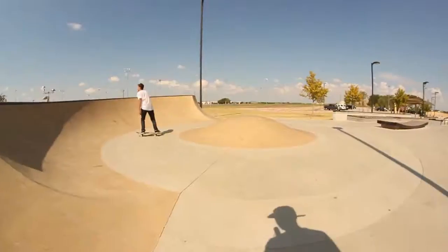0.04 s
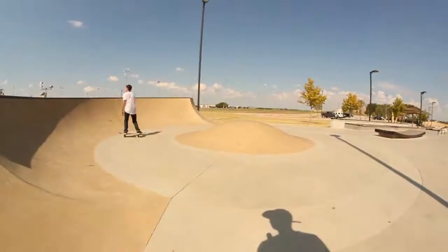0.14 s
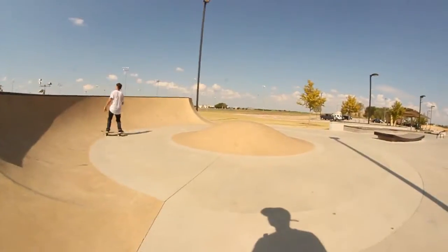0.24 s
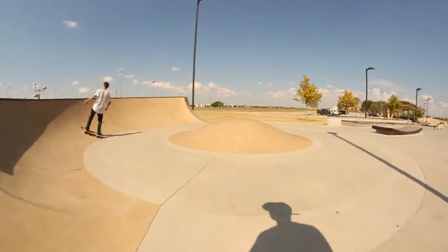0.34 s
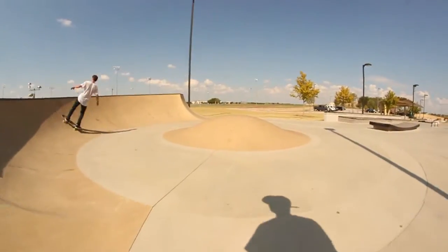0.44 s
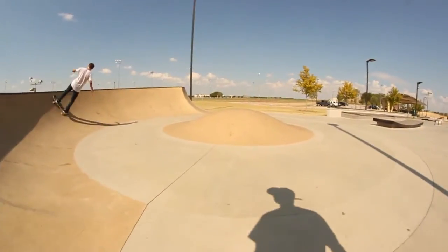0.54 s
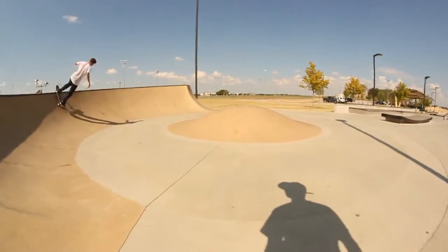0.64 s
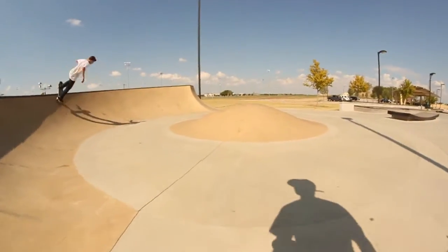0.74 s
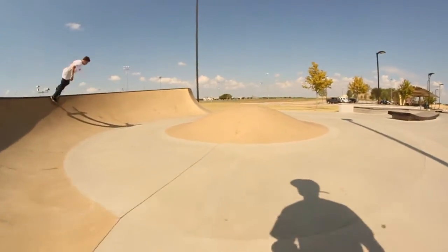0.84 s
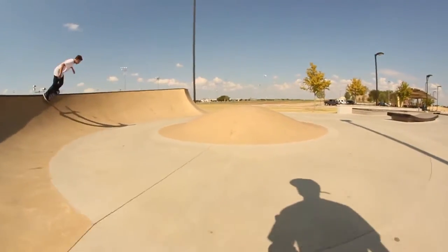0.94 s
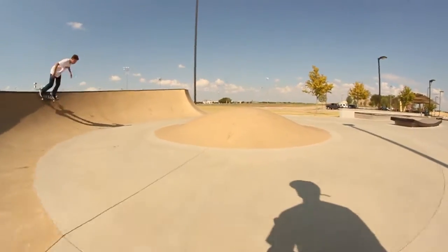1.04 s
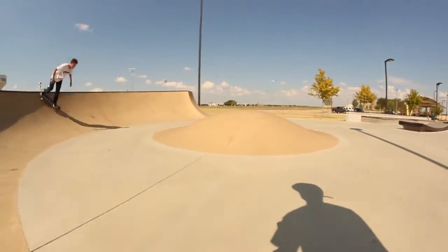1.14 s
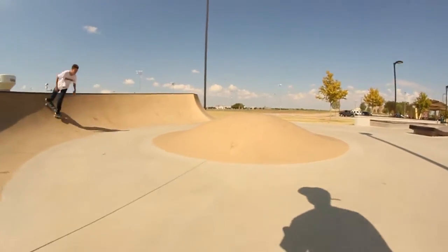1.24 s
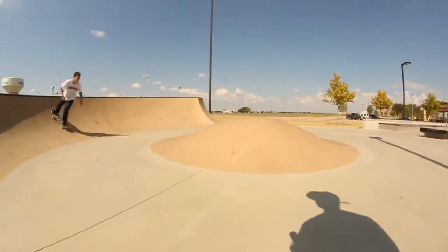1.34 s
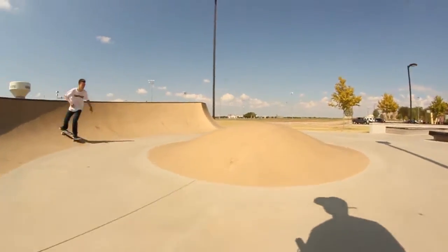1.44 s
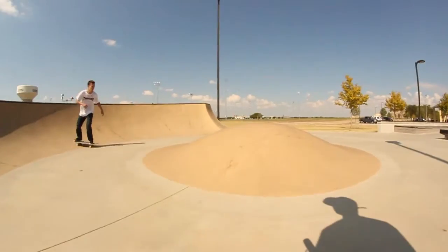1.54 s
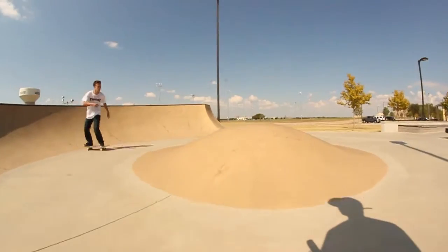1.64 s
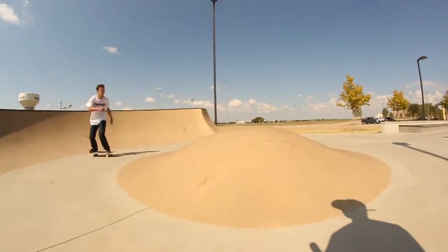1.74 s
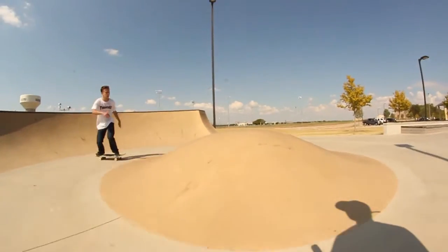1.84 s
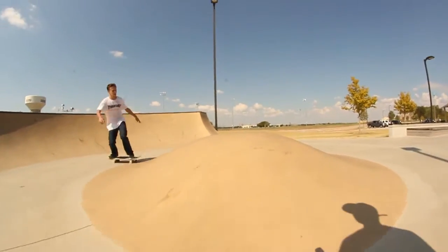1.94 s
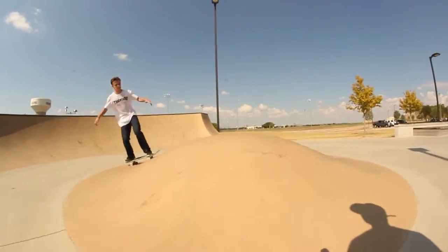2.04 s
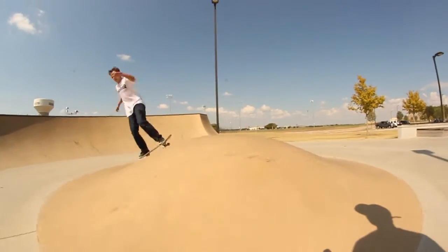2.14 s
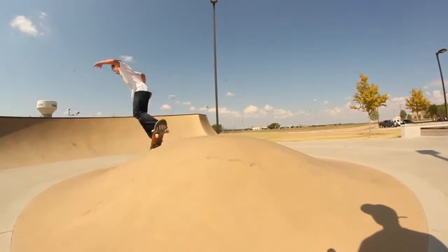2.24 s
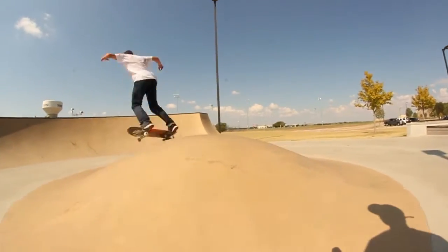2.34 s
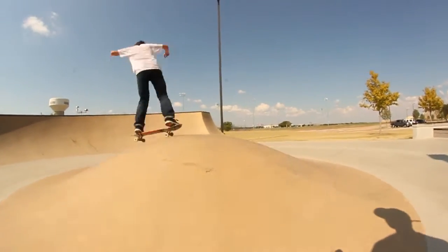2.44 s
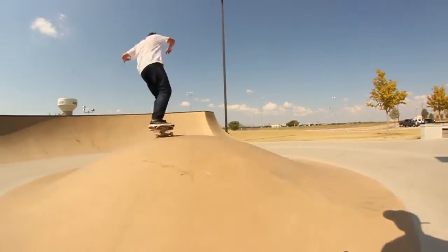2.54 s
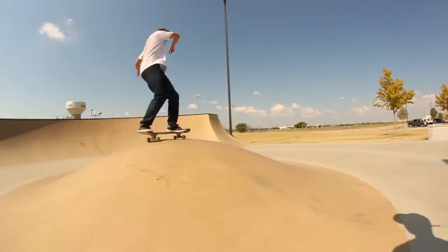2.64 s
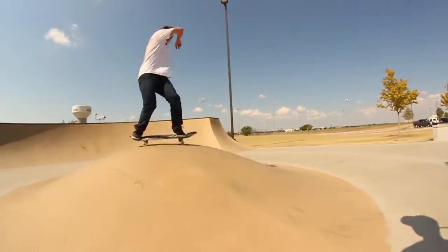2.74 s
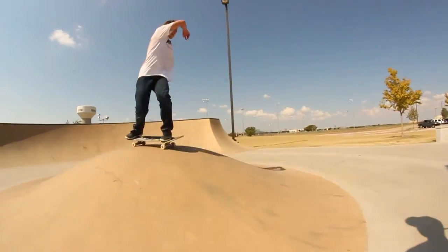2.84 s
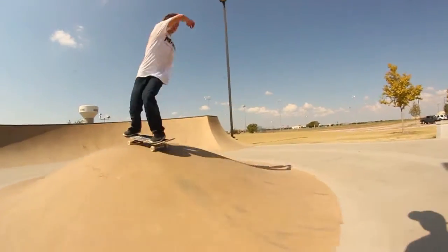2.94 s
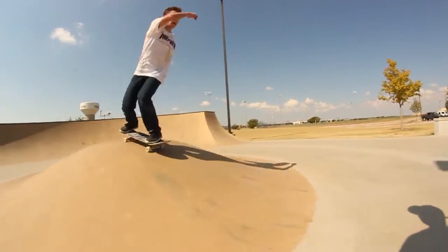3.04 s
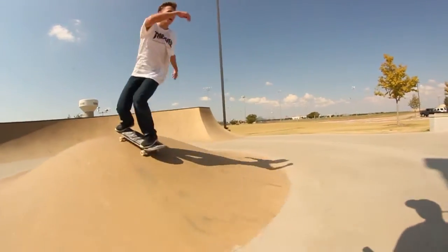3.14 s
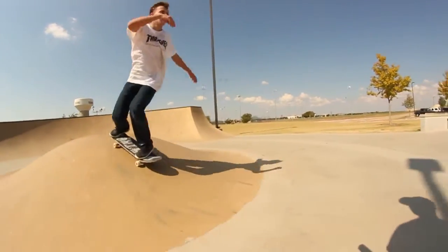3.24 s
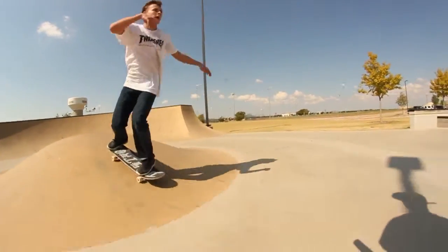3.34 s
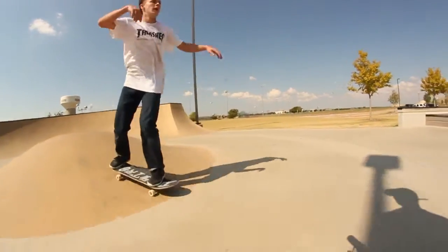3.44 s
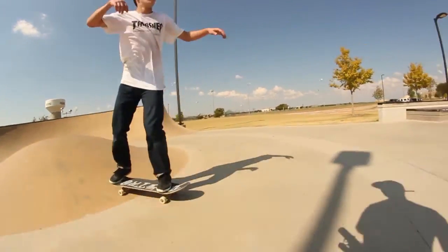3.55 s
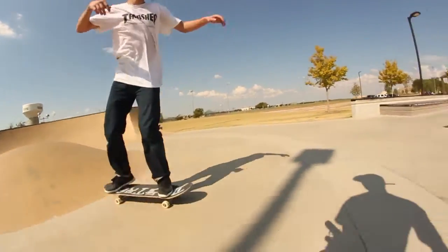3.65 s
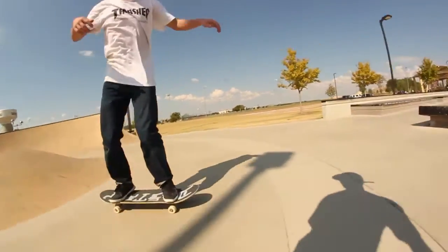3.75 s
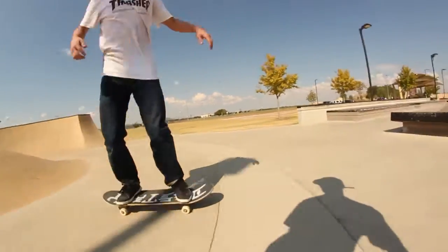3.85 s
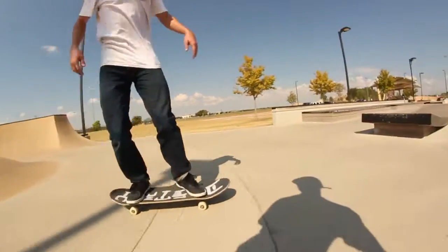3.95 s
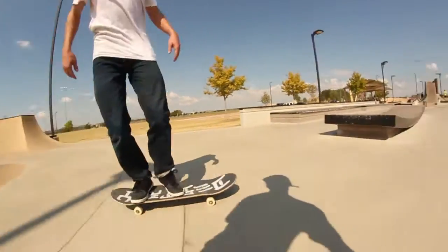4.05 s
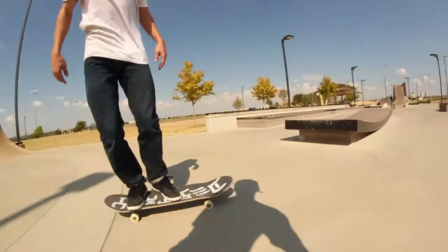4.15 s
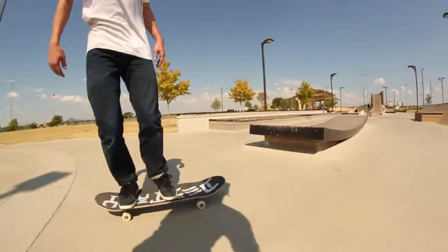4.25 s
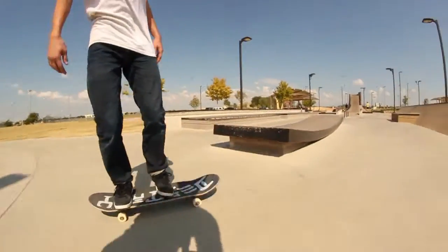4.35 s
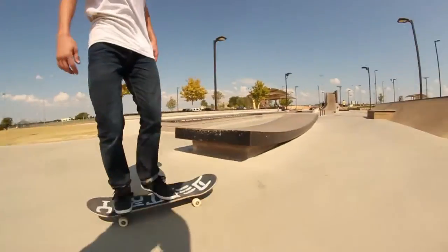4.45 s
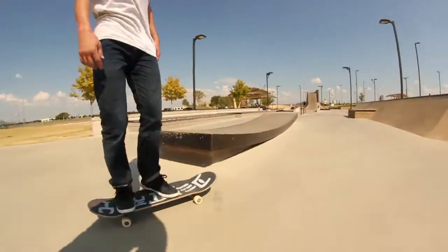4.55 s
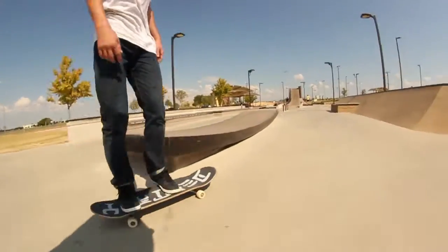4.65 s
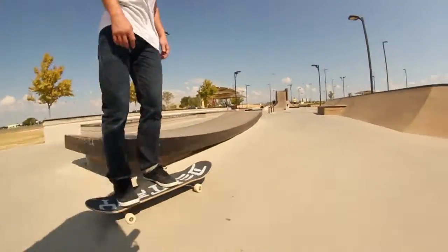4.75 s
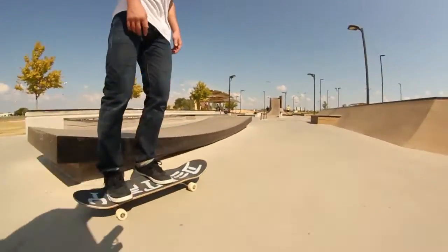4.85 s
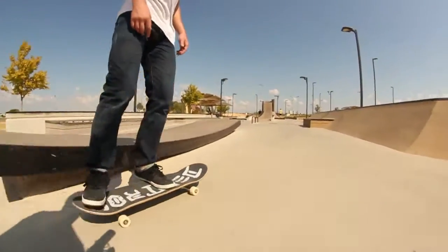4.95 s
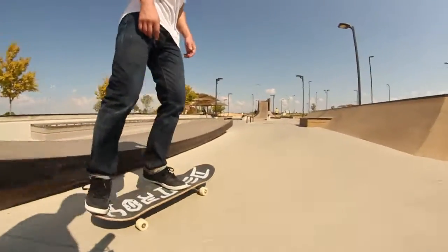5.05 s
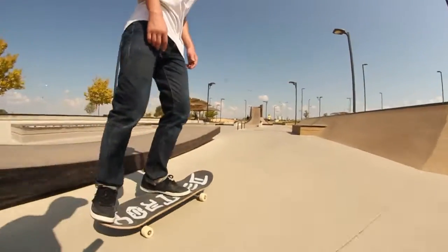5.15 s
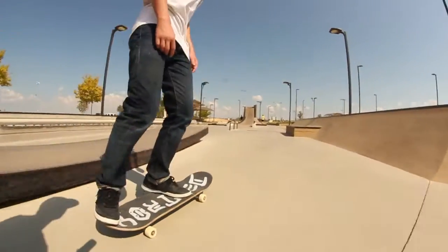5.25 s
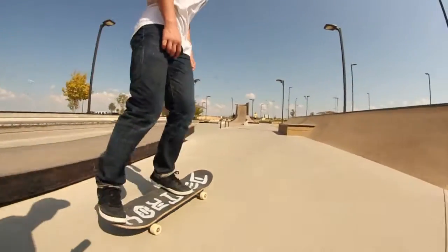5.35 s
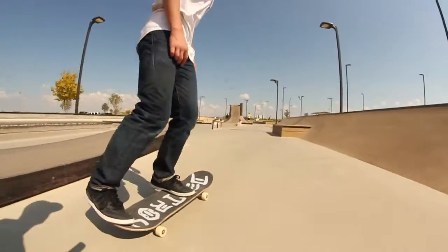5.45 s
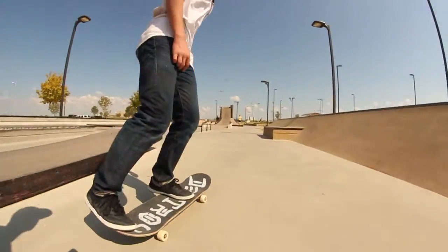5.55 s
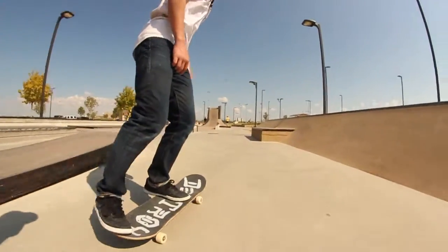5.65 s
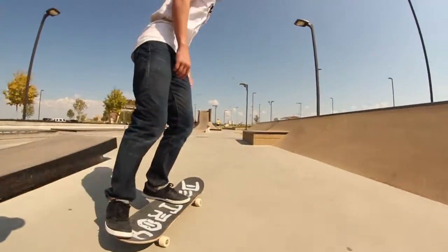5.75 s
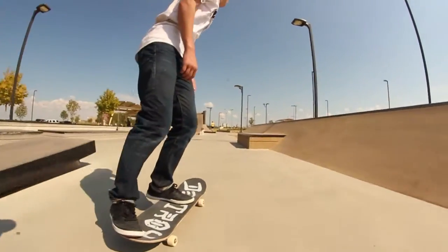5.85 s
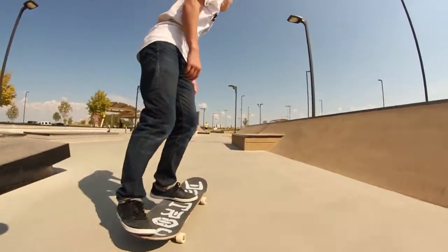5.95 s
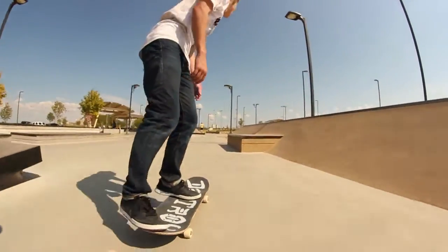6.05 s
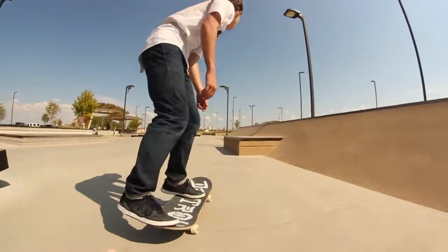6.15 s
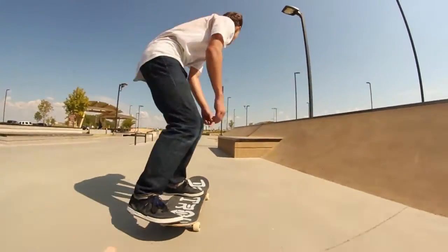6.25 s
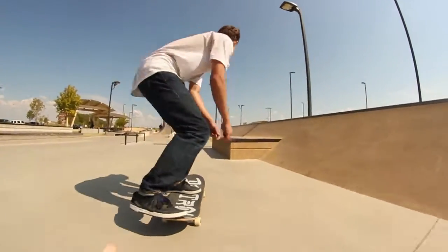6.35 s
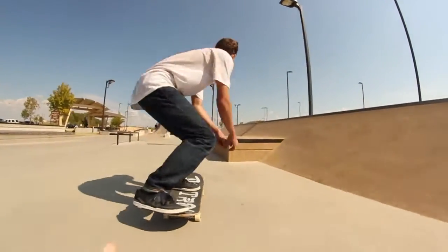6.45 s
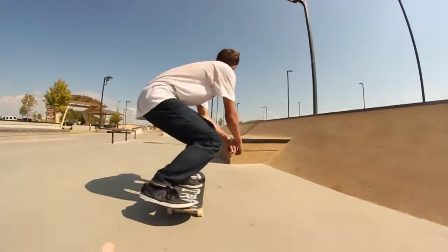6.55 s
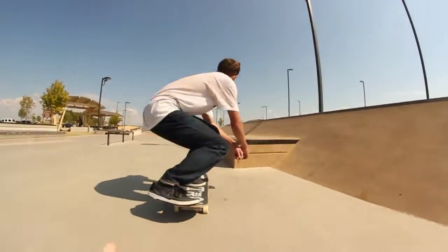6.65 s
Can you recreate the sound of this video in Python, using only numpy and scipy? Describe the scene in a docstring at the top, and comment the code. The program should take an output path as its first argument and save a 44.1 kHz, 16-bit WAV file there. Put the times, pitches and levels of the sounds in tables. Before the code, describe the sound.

Skateboard wheels roll over gritty concrete, with sharp clacks, short chattering skids and wind buffeting the microphone as the board comes closer.

```python
"""Skateboard in a concrete bowl

A skateboarder carves, hops onto a mound, slides round and rolls past close to a following camera.
Hard wheels roar on the grit, clack on landings and joints, and chatter in short skids.
The slab mirrors the board's sound as a wandering notch; wind buffets the microphone."""
import sys
import numpy as np
from scipy import signal
from scipy.fft import rfft, irfft, next_fast_len
from scipy.io import wavfile
from scipy.ndimage import uniform_filter1d, map_coordinates

SR = 44100
rng = np.random.default_rng(int(sys.argv[2]) if len(sys.argv) > 2 else 0)


def int16_out(signal):
    """Quantize to a 16-bit WAV file."""
    q = np.round(np.clip(np.atleast_2d(signal).T, -1, 1) * 32767)
    wavfile.write(sys.argv[1], SR, q.astype(np.int16))


N = 295029

# The tone of wheels on concrete: low roar, sandy grit, fine hiss.
# Each row: frequency in Hz, relative level in dB.
ROAR_SPECTRUM = [(150, -5.5), (330, -17), (500, 0), (760, -.5), (950, -2.5), (1300, -2.5), (1700, -10),
                 (2400, -13.5)]
GRIT_SPECTRUM = [(1100, -2.5), (2000, 0), (3250, 2.5), (4500, -8), (5400, -9.5), (6500, -19.5), (8500, -19)]
HISS_SPECTRUM = [(5000, 8.5), (10000, -3), (13000, -8), (16000, -7.5)]
# The ring of steel trucks and bearings. Each row: frequency in Hz, width in Hz, relative level in dB.
STEEL_RESONANCES = [(3350, 48, 14.5), (4080, 650, 6), (5030, 270, 6.5), (5440, 55, 13.5), (5900, 120, 6.5)]


def amp(db):
    """Decibels to gain."""
    return 10 ** (np.asarray(db) / 20)


def unit(x):
    """Scale to rms 1."""
    return x / np.sqrt(np.mean(x ** 2) + 1e-20)


def curve(points):
    """Straight lines through (seconds, value) points, one value a sample."""
    return np.interp(np.arange(N) / SR, *np.transpose(points))


def swells(rows):
    """Bell-shaped rises in dB. Each row: centre in seconds, length in seconds, rise in dB."""
    t = np.arange(N) / SR
    return sum(db * np.exp(-(2 * (t - centre) / length) ** 2) for centre, length, db in rows)


def wobble(rate):
    """A smooth random curve, rate knots a second."""
    knots = rng.standard_normal(int(N * rate / SR) + 4)
    return map_coordinates(knots, [np.arange(N) * rate / SR])


def noise(length=N):
    """White noise."""
    return rng.standard_normal(length)


def grains(rate, spread_db):
    """Tiny impacts on sand grains, rate a second, of scattered size."""
    hits = rng.random(N) < rate / SR
    return unit(hits * noise() * amp(spread_db * noise()))


def filtered(x, response):
    """x through a filter whose gain is a function of frequency."""
    size = next_fast_len(len(x) + 8192)
    return irfft(rfft(x, size) * response(np.fft.rfftfreq(size, 1 / SR)), size)[:len(x)]


def coloured(x, spectrum):
    """x shaped by (Hz, dB) points on a log axis, at rms 1."""
    hz, db = np.transpose(spectrum)
    response = lambda f: amp(np.interp(np.log(f + 1), np.log(hz), db, left=-120, right=-120))
    return unit(filtered(x, response))


def resonate(x, peaks):
    """x through (Hz, width Hz, dB) resonances of alternating sign, at rms 1."""
    def response(f):
        return sum((-1) ** k * amp(db) * 1j * f * width / (hz * hz - f * f + 1j * f * width)
                   for k, (hz, width, db) in enumerate(peaks))
    return unit(filtered(x, response))


def noise_band(hz, width_hz):
    """Noise passed twice through one resonance."""
    peak = [(hz, width_hz, 0)]
    return resonate(resonate(noise(), peak), peak)


def air():
    """A faint steady hiss lies under everything."""
    return amp(-56) * coloured(noise(), [(100, 10), (16000, -8)])


def wind():
    """Eddies thump the microphone port as hard as each gust drives them; small ones come in flurries."""
    # Airflow over the moving camera. Each row: time in seconds, strength in dB.
    airflow = [(0.0, -37), (0.18, -49), (1.36, -42), (2.8, -18), (4.19, -13.5), (4.55, -20), (5.01, -21),
               (6.15, -31.5), (6.69, -27.5)]
    # Gusts and lulls. Each row: centre in seconds, length in seconds, rise in dB.
    gusts = [(0.677, 0.14, 14.5), (1.08, 0.28, 9), (1.717, 0.08, 11.5), (3.12, 0.024, 7.5), (3.2, 0.11, -6),
             (3.27, 0.021, 8), (3.34, 0.03, 6.5), (3.65, 0.41, 3), (4.18, 0.11, 4.5), (4.92, 0.15, 8.5),
             (6.414, 0.09, 14.5), (6.63, 0.15, 9.5)]
    # The rumble of large eddies. Each row: frequency in Hz, relative level in dB.
    buffet_spectrum = [(12, -0.5), (75, 2.5), (115, -4), (160, -13), (350, -27), (700, -83)]
    # Small eddies grow with speed. Each row: time in seconds, level in dB against the large ones.
    flurries = [(1.5, -13.5), (3.9, -8), (4.8, -5)]
    buffet_db = 2  # against the airflow
    eddies = coloured(noise(), buffet_spectrum)
    levelled = eddies / np.sqrt(np.abs(uniform_filter1d(eddies ** 2, size=SR // 16)))
    large = levelled * amp(2.4 * wobble(26))
    small = coloured(noise(), [(70, -11), (150, 0), (260, -11), (600, -30.5)]) * amp(5.1 * wobble(18))
    level = amp(curve(airflow) + swells(gusts) + buffet_db)
    return level * (unit(large) + amp(curve(flurries)) * unit(small))


def slab_bounce(x):
    """Direct sound and its bounce off the concrete cancel in one band and add up just above it."""
    # The path of the notch. Each row: time in seconds, frequency in Hz, depth in dB.
    notch_path = [(.25, 13500, 4), (.48, 6800, 11), (.72, 5000, 7), (.97, 3700, 8), (1.1, 7200, 3),
                  (1.35, 6100, 9), (1.92, 8600, 10), (2.1, 7800, 3), (3.1, 7800, 5), (5.2, 8000, 2),
                  (5.95, 9200, 6), (6.65, 11800, 7)]
    width_hz, lift_above_hz, lift_share = 1300, 3200, 0.5
    hz, t, spectrum = signal.stft(x, SR, nperseg=256)
    times, notch_hz, depth_db = np.transpose(notch_path)
    offset_hz = hz[:, None] - np.interp(t, times, notch_hz)
    dip = np.exp(-(offset_hz / width_hz) ** 2)
    lift = lift_share * np.exp(-((offset_hz - lift_above_hz) / width_hz) ** 2)
    gain = amp(np.interp(t, times, depth_db) * (lift - dip))
    return signal.istft(spectrum * gain, SR, nperseg=256)[1][:N]


def free_spin():
    """With the weight off them the wheels spin on, and only the bearings sound."""
    # Each row: start in seconds, end in seconds, level in dB.
    spins = [(0.0, 0.15, -52.5), (2.08, 2.736, -45.5), (2.882, 2.94, -49.5)]
    rise_s, fade_s = 0.029, 0.037
    t = np.arange(N) / SR
    level = sum(amp(db) * np.exp(-np.maximum(start - t, 0) / rise_s - np.maximum(t - end, 0) / fade_s)
                for start, end, db in spins)
    balls = coloured(noise(), [(4000, 4.5), (6500, 5), (11000, -0.5), (16000, 0)])
    return level * (balls + amp(-1) * resonate(noise(), STEEL_RESONANCES))


def carve_hum():
    """Wheels and deck hum in one narrow, gliding resonance as the rider leans into a carve."""
    # Each row: start in seconds, end in seconds, first pitch in Hz, last pitch in Hz, level in dB.
    carves = [(0.151, 0.68, 621, 792, -41), (0.864, 1.137, 718, 621, -46), (4.43, 4.778, 660, 648, -32.5),
              (5.27, 6.29, 515, 499.4, -38.5)]
    width_hz = 75
    t, out = np.arange(N) / SR, np.zeros(N)
    for start, end, first_hz, last_hz, db in carves:
        progress = np.clip((t - start) / (end - start), 0, 1)
        phase = 2 * np.pi * np.cumsum(first_hz + (last_hz - first_hz) * progress) / SR
        hum = unit(wobble(width_hz) * np.cos(phase) + wobble(width_hz) * np.sin(phase))
        out += amp(db) * np.sqrt(np.abs(np.sin(np.pi * progress))) * hum
    return out


def rubs():
    """Shoes and wheels drag and squeak: fine slips swell and fade in one resonance."""
    # Each row: centre in seconds, length in seconds, pitch in Hz, width in Hz, level in dB.
    squeaks = [(2.561, 0.022, 4100, 600, -17.5), (2.735, 0.018, 2980, 7000, -35),
               (3.098, 0.036, 2850, 2170, -30), (3.918, 0.064, 4280, 1500, -30.5),
               (4.097, 0.04, 5400, 1200, -26)]
    t = np.arange(N) / SR
    return sum(amp(db) * np.exp(-(2 * (t - centre) / length) ** 2) * noise_band(hz, width_hz)
               for centre, length, hz, width_hz, db in squeaks)


def skids():
    """Urethane sticks and slips sideways; the chatter slows under load and rises as the wheel grips."""
    # Each row: start, peak and end in seconds, chatter level in dB, chatter rate at full load in Hz,
    # roughness from 0 to 1, scrape level in dB, fizz level in dB.
    slides = [(1.248, 1.264, 1.32, -24, 389, 0.9, -20, -28),
              (1.304, 1.352, 1.387, -13, 365, .1, -19, -26.5),
              (2.283, 2.302, 2.316, -14, 470, .35, -20, -21.5),
              (2.317, 2.343, 2.369, -14, 430, .35, -18, -19.5),
              (2.547, 2.559, 2.597, -18, 400, .6, -18.5, -19.5),
              (2.565, 2.595, 2.614, -13.5, 350, .15, -20, -25.5),
              (2.955, 2.963, 2.977, -20, 460, .55, -23, -28),
              (4.045, 4.091, 4.135, -22, 330, .83, -29, -28)]
    # A slipping wheel rings truck and deck. Each row: frequency in Hz, width in Hz, relative level in dB.
    body = [(417, 290, 0), (730, 244, 8), (1070, 365, 5), (1480, 95, -5), (1823, 58, -0.5)]
    # The coarse scrape and the bright fizz above it. Each row: frequency in Hz, relative level in dB.
    scrape_spectrum = [(400, 5), (1100, 13), (2000, 10), (3800, 4.5), (4800, -42), (7000, -51)]
    fizz_spectrum = [(2500, -1), (4000, 3), (5700, 6.5), (7200, 0), (10000, -3.5), (16000, -7)]
    scrape = coloured(grains(rate=14000, spread_db=2), scrape_spectrum)
    scrape += amp(-10) * resonate(noise(), STEEL_RESONANCES)
    fizz = coloured(noise(), fizz_spectrum)
    drift, bounce = wobble(500), amp(1.8 * wobble(350))
    judder = resonate(noise(), body)
    out = np.zeros(N)
    for start, peak, end, chatter_db, hz, rough, scrape_db, fizz_db in slides:
        span = np.arange(round(start * SR), round(end * SR))
        load = np.interp(span / SR, [start, peak, end], [0, 1, 0])
        slip_hz = hz * (1 + 0.4 * (1 - load) ** 1.3) * (1 + 0.12 * rough * drift[span])
        cycles = np.cumsum(slip_hz) / SR
        slips = np.diff(np.floor(cycles), prepend=0) * amp(0.8 * noise(len(span)))  # one kick a cycle
        chatter = np.sqrt(1 - rough) * resonate(slips, body) + np.sqrt(rough) * judder[span]
        friction = amp(scrape_db) * scrape[span] + amp(fizz_db) * fizz[span]
        out[span] += amp(chatter_db) * load * chatter + load ** 0.76 * bounce[span] * friction
    return out


def rattle():
    """Joints shake the trucks: a dense, uneven run of small knocks, as rows for clacks()."""
    # Start in seconds, end in seconds, knock level in dB.
    start, end, db = (3.99, 4.175, -12.5)
    knocks_per_s = 70
    times = np.arange(start, end, 1 / knocks_per_s)
    scatter = rng.uniform(-1, 1, (len(times), 2))
    return [(time + 0.5 * shift / knocks_per_s, db + 2 * size, db - 18)
            for time, (shift, size) in zip(times, scatter)]


def clacks():
    """Each blow rings the board at new strengths, with a crack of crushed grit and a ring of steel."""
    # Wheels and tail hit concrete. Each row: start in seconds, knock strength in dB, crack strength in dB.
    blows = [(0.328, -11.5, -62), (0.403, -17.5, -39), (1.248, -8.5, -14.5), (1.259, -9.5, -24),
             (1.283, -14, -22), (1.293, -15, -24), (1.302, -14, -21), (1.81, -14, -25), (2.207, -24, -26),
             (2.294, -16, -20), (2.516, -26, -28), (2.686, -20.5, -35), (2.726, -22, -33),
             (2.547, -1.5, -18), (2.942, -12, -17), (3.193, -23, -30), (3.715, -25, -23), (5.049, -20, -27),
             (5.79, -24, -27), (3.969, -1.5, -16), (4.058, 2, -18), (4.094, -9.5, -23), (4.19, -3, -22),
             (6.108, -7, -30), (6.225, -5, -25)]
    # Deck, trucks and wheels. Each row: frequency in Hz, relative level in dB, seconds to fall 60 dB.
    board_modes = [(370, -5, 0.03), (487, -3.5, 0.063), (585, -12.5, 0.11), (709, 1.5, 0.024),
                   (934, 2, 0.019), (1050, -3.5, 0.05), (1343, -5.5, 0.029), (1797, -12, 0.032),
                   (2150, -3, 0.01), (3350, -11, 0.021)]
    t, out = np.arange(SR // 4) / SR, np.zeros(N + SR)
    hz, mode_db, t60 = np.transpose(board_modes)[:, :, None]
    attack = 1 - np.exp(-t / 0.0004)

    def decay(db, t60):
        return amp(db - 60 * t / t60)

    for start, knock_db, crack_db in blows + rattle():
        strength, detune = rng.standard_normal((2, len(board_modes), 1))
        # a blow with little crack loses its upper modes and lands dull
        dulling_db = 0.4 * min(crack_db - knock_db + 22, 0) * np.log2(np.maximum(hz / 600, 1))
        tones = np.sin(2 * np.pi * hz * (1 + 0.03 * detune) * t)
        modes = decay(mode_db + dulling_db + 2 * strength, t60) * tones
        ring = attack * np.sum(modes * rng.choice([-1, 1], (len(board_modes), 1)), axis=0)
        knock = amp(knock_db + 1) * ring / np.abs(ring).max()
        thud = decay(knock_db - 15, t60=0.027) * coloured(noise(len(t)), ROAR_SPECTRUM)
        crack = decay(crack_db - 1, t60=0.037) * coloured(noise(len(t)), GRIT_SPECTRUM)
        steel = decay(crack_db - 10, t60=0.073) * resonate(noise(len(t)), STEEL_RESONANCES)
        sizzle = decay(crack_db - 1.5, t60=0.018) * coloured(noise(len(t)), HISS_SPECTRUM)
        out[round(start * SR):][:len(t)] += knock + attack * (thud + crack + steel + sizzle)
    return out[:N]


def patchy_concrete(x, spread_db=1.3):
    """No two stretches of concrete are alike: narrow bands of the sound surge and sink by chance."""
    spectrum = signal.stft(x, SR, nperseg=512)[2]
    patches = uniform_filter1d(rng.standard_normal(spectrum.shape), size=6, axis=0)  # across frequency
    patches = uniform_filter1d(patches, size=12, axis=1)  # across time
    return signal.istft(spectrum * amp(spread_db * unit(patches)), SR, nperseg=512)[1][:N]


def rolling():
    """Grains under the wheels shake the board; uneven concrete makes the roar flutter; bearings whirr."""
    # The roll follows speed, load and distance. Each row: time in seconds, strength in dB.
    strength = [(0.0, -43), (0.47, -36), (0.75, -45.5), (1.3, -46.5), (1.43, -35), (1.96, -36),
                (2.16, -31.5), (2.79, -42.5), (2.96, -47.5), (3.37, -32), (3.52, -29), (4.04, -26),
                (4.86, -30.5), (5.11, -28), (5.72, -31), (6.69, -32.5)]
    # Steering scrubs the wheels sideways.
    # Each row: centre in seconds, length in seconds, roar rise in dB, grit rise in dB.
    scrubs = [(0.995, 0.19, 6, -2), (1.1, 0.13, 1.5, 5.5), (2.036, 0.21, 3.5, 4), (3.023, 0.2, 2.5, 11),
              (3.513, 0.21, 2, 4), (5.353, 0.33, 2.2, 3), (6.25, 0.94, 2.8, 4)]
    # The deck booms under load and thins as the rider hangs light on the wall.
    # Each row: time in seconds, level in dB against the roll.
    deck_boom = [(.55, 3), (.85, -11), (1.6, -7), (4.9, -3), (5.5, -10.5)]
    firm_db = -30  # strength of a firm roll close by
    roar_db, grit_db, hiss_db = -1.5, -7.5, -14.5  # each layer against a firm roll
    grit_growth, hiss_growth = 1.045, 1.33  # dB per dB of strength: harder rolling is brighter
    roar_rise_db = swells([(centre, length, db) for centre, length, db, _ in scrubs])
    grit_rise_db = swells([(centre, length, db) for centre, length, _, db in scrubs])
    effort_db = curve(strength) - firm_db
    flutter_db = 0.53 * wobble(80) + 0.65 * wobble(14)
    roar = amp(roar_db + effort_db + roar_rise_db + flutter_db) * coloured(noise(), ROAR_SPECTRUM)
    boom = amp(curve(deck_boom) + effort_db + roar_rise_db) * noise_band(hz=406, width_hz=394)
    sand = grains(rate=3500, spread_db=2)
    coarse_ticks = amp(-13.5) * grains(rate=45, spread_db=0)
    grit_level = amp(grit_db + grit_growth * effort_db + grit_rise_db + flutter_db)
    grit = grit_level * coloured(sand + coarse_ticks, GRIT_SPECTRUM)
    bearings = amp(-1.5) * resonate(noise(), STEEL_RESONANCES)
    fine_hiss = coloured(grains(rate=20000, spread_db=2.5), HISS_SPECTRUM)
    whirr_level = amp(hiss_db + hiss_growth * (effort_db + grit_rise_db / 2) + flutter_db)
    whirr = whirr_level * (fine_hiss + bearings)
    return amp(firm_db) * patchy_concrete(roar + boom + grit + whirr)


def scene():
    """The board over its slab, in the wind, in mono."""
    board = rolling() + free_spin() + carve_hum() + clacks() + skids() + rubs()
    return slab_bounce(board) + wind() + air()


def record(dry):
    """The camera rounds off the highest peaks and keeps nothing above its band limit."""
    top_hz = 15800
    rounded = dry / (1 + np.abs(dry) ** 8) ** (1 / 8)
    return filtered(rounded, lambda hz: hz < top_hz)


dry = scene()
out = record(dry)
int16_out(out)
```